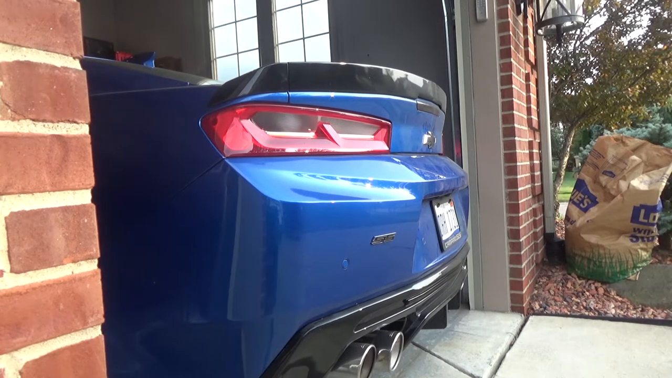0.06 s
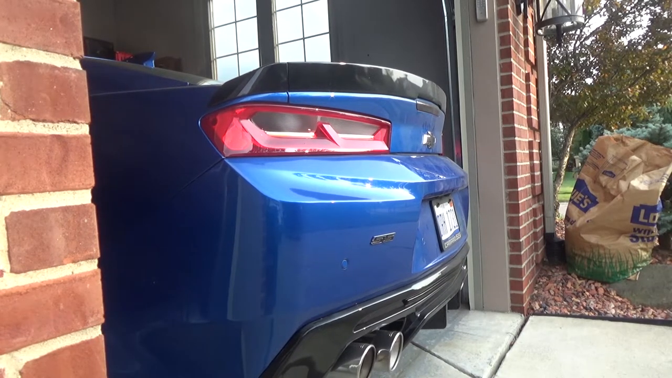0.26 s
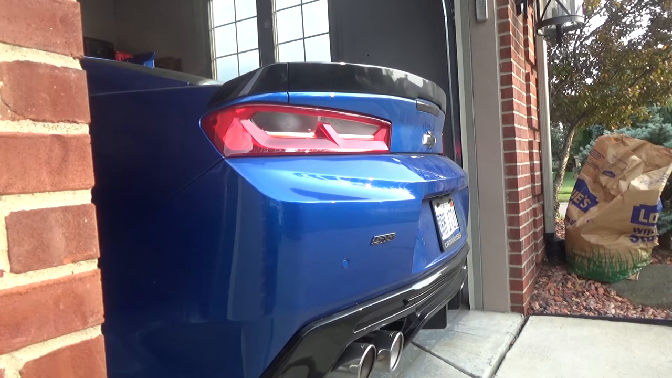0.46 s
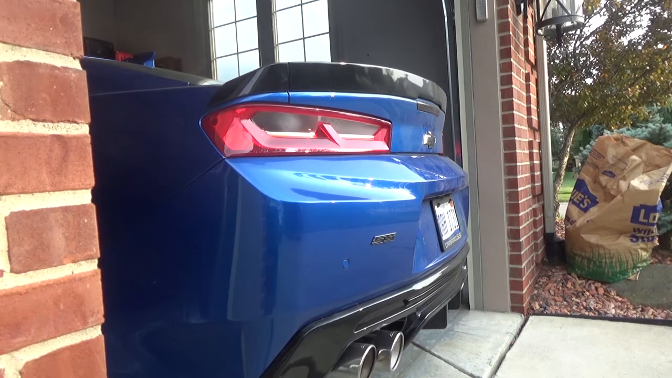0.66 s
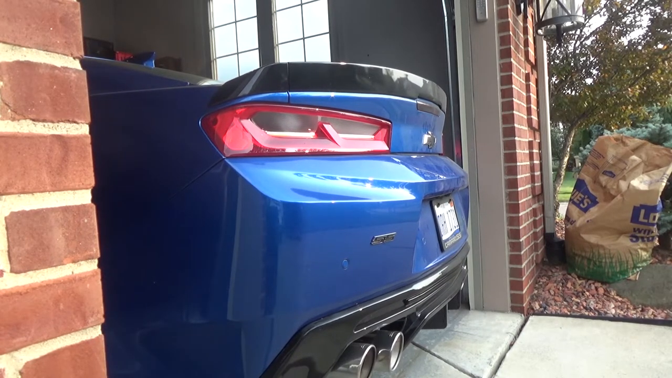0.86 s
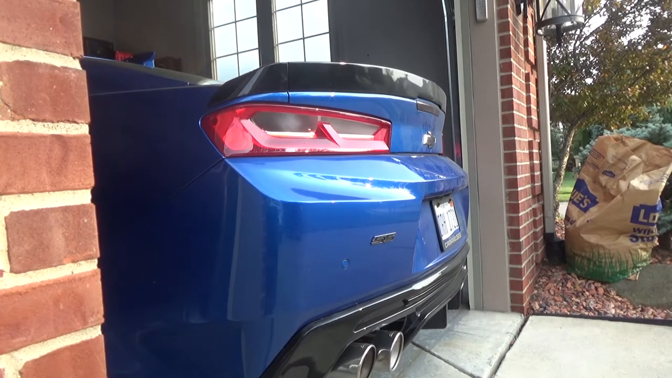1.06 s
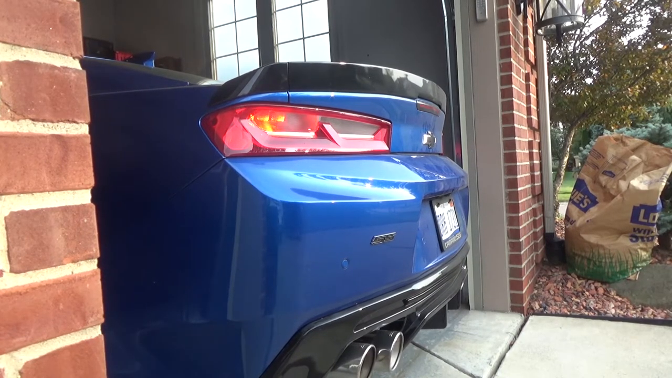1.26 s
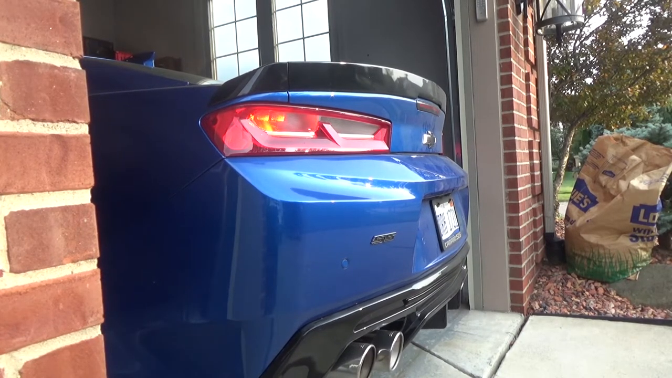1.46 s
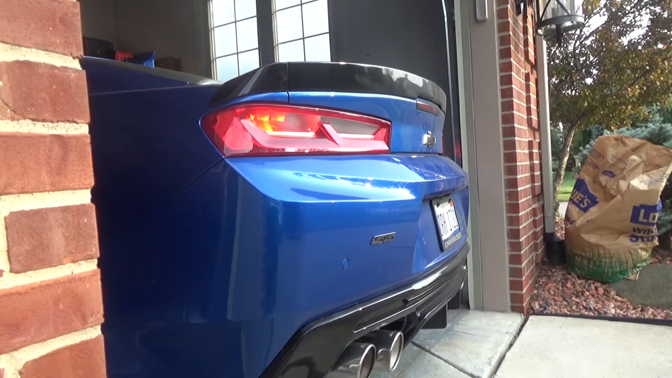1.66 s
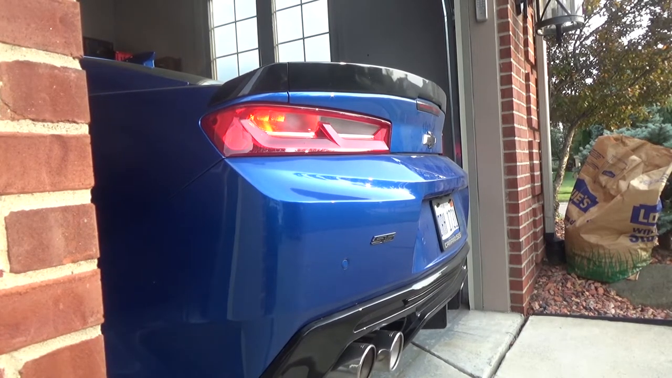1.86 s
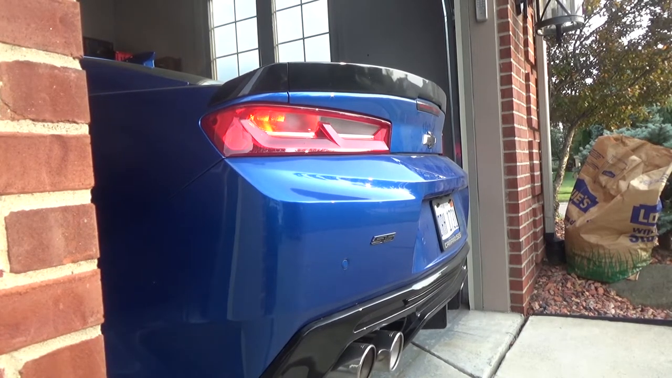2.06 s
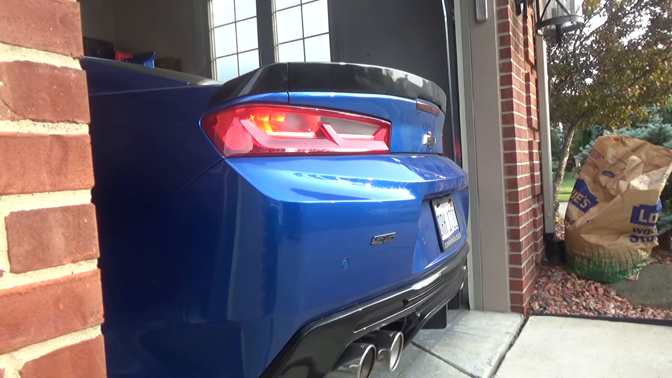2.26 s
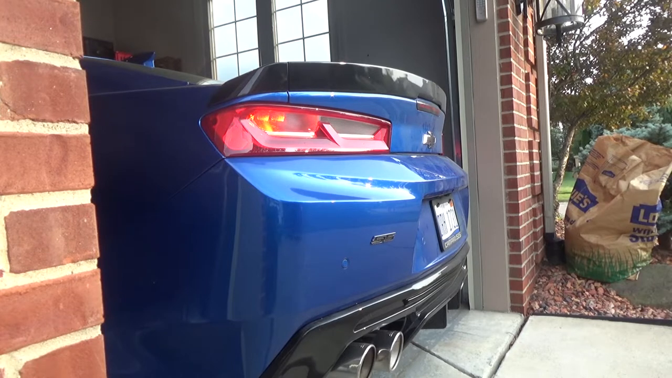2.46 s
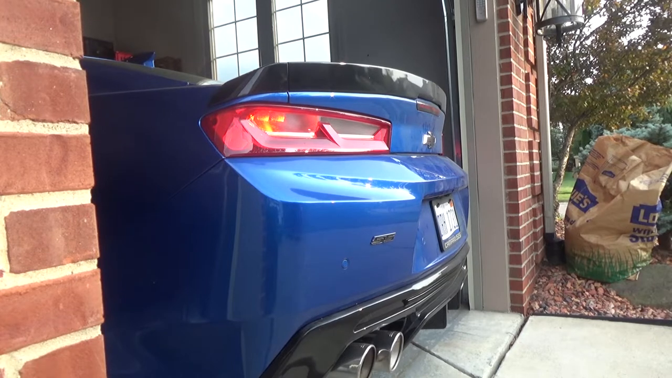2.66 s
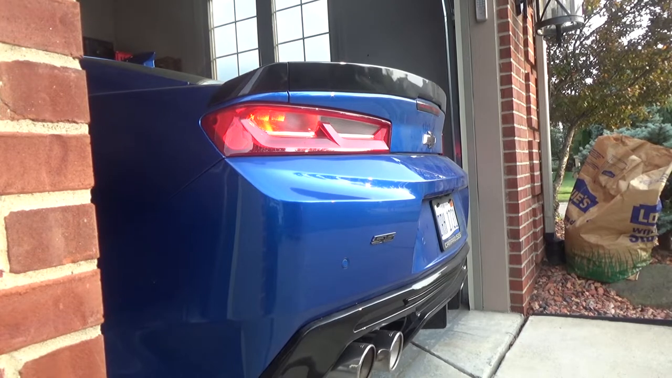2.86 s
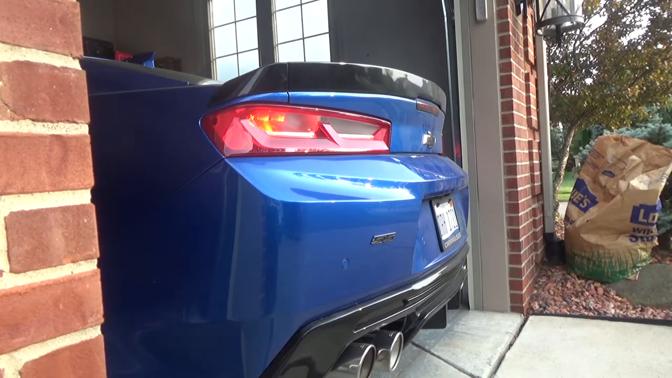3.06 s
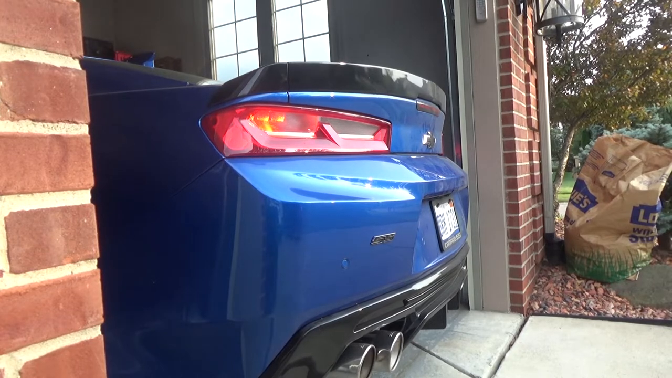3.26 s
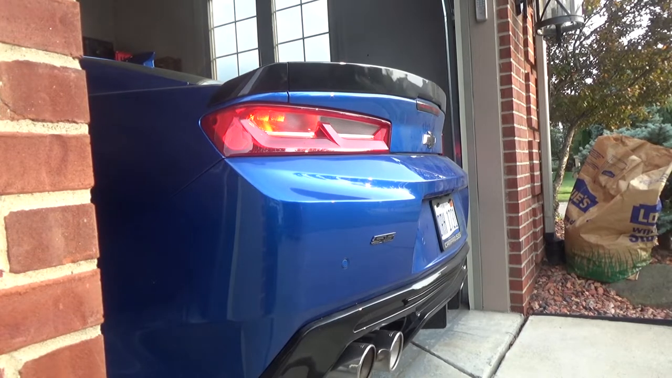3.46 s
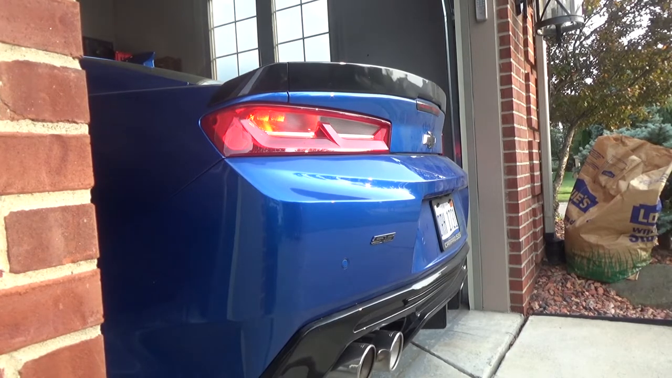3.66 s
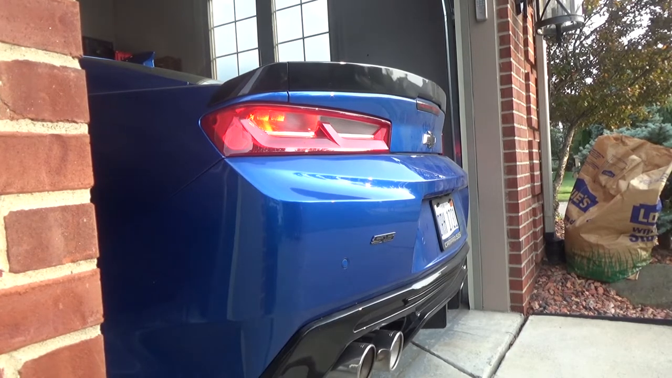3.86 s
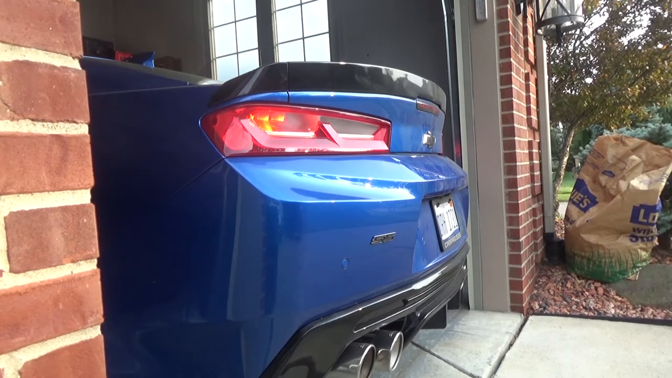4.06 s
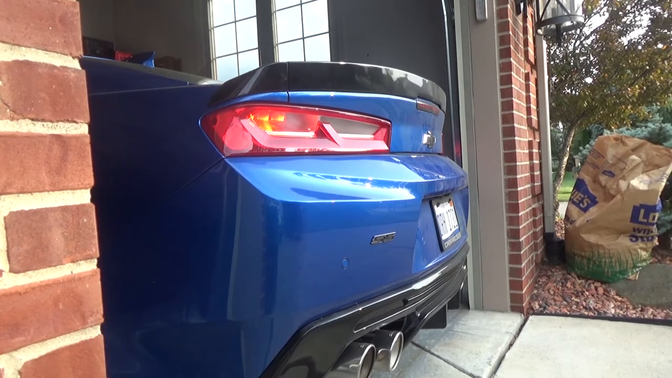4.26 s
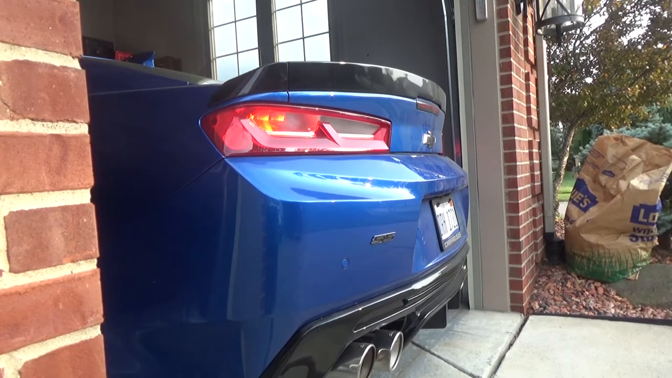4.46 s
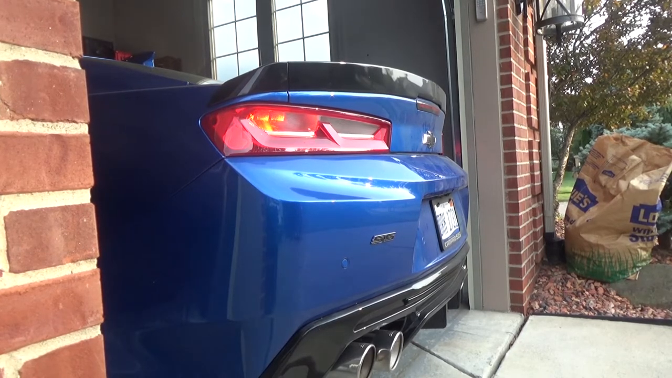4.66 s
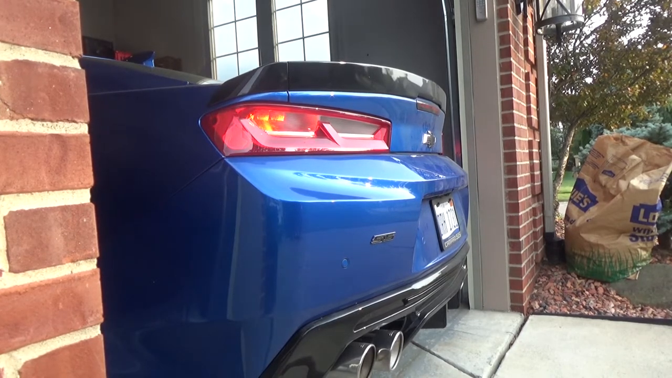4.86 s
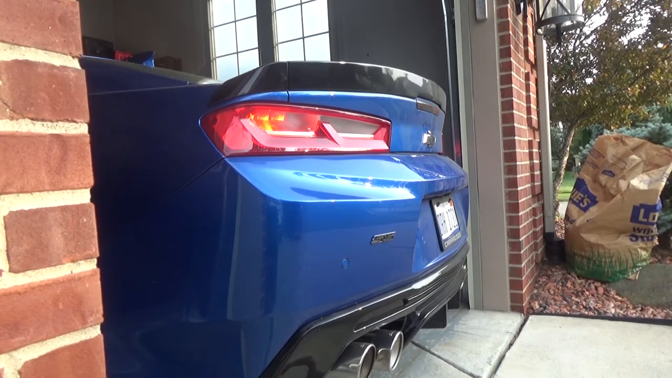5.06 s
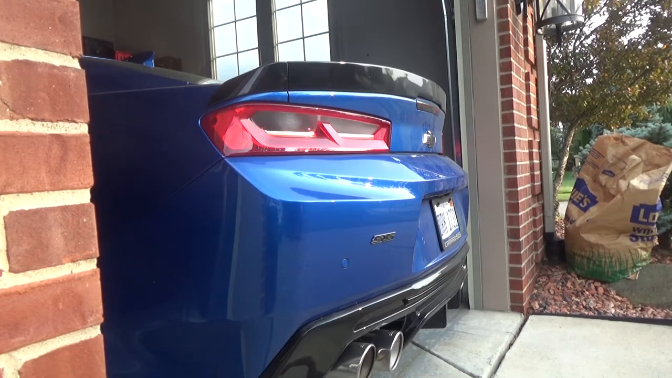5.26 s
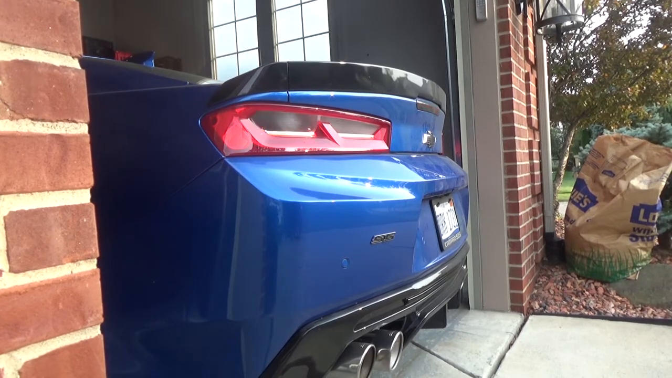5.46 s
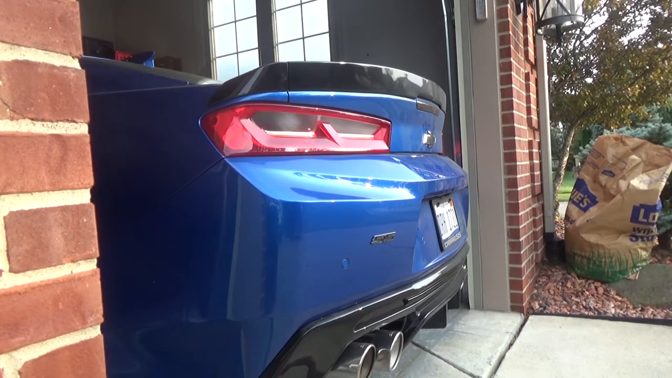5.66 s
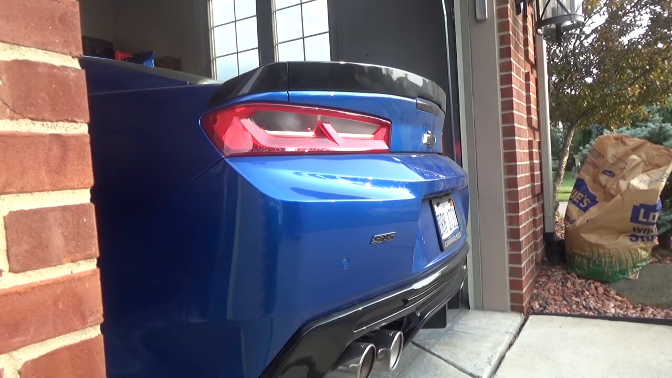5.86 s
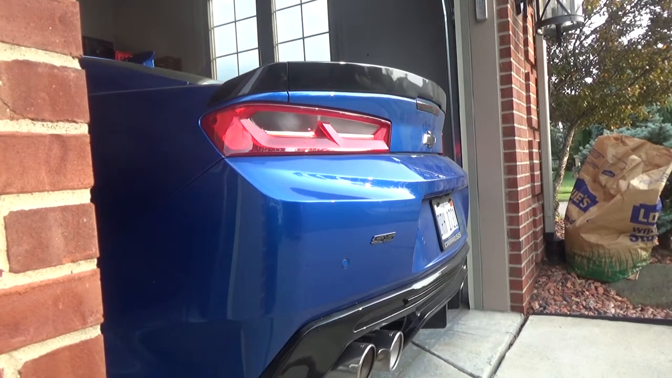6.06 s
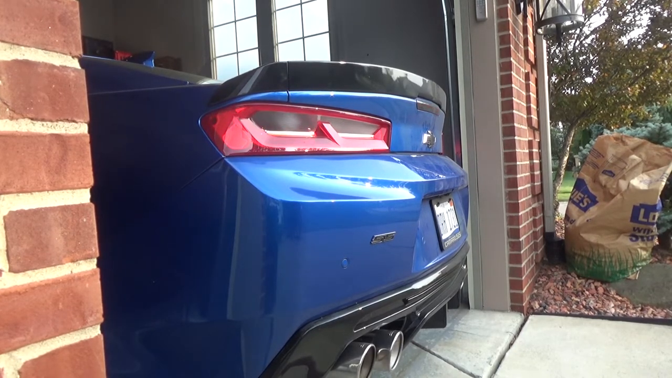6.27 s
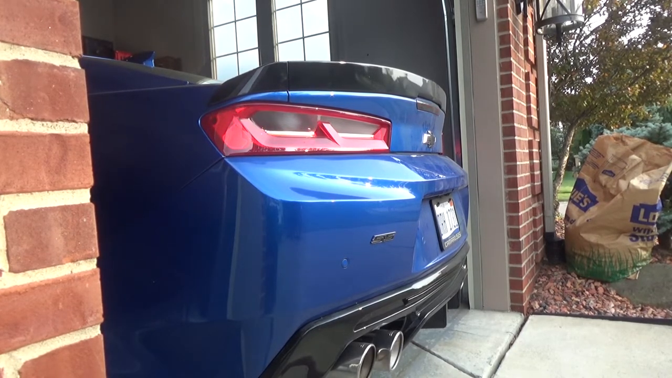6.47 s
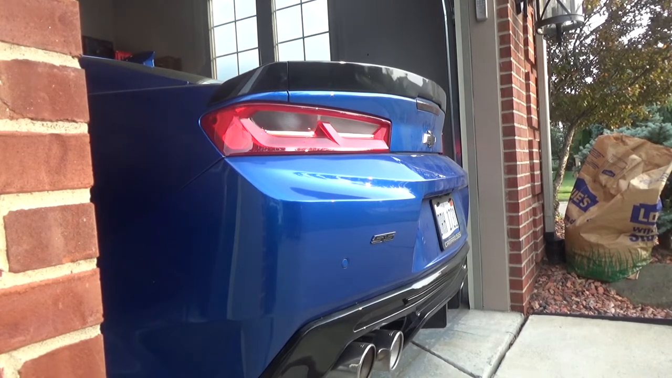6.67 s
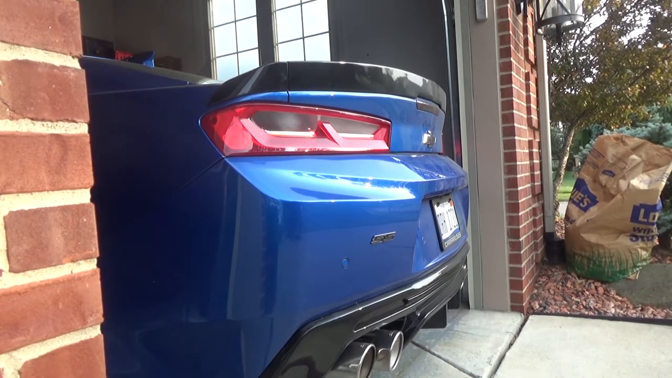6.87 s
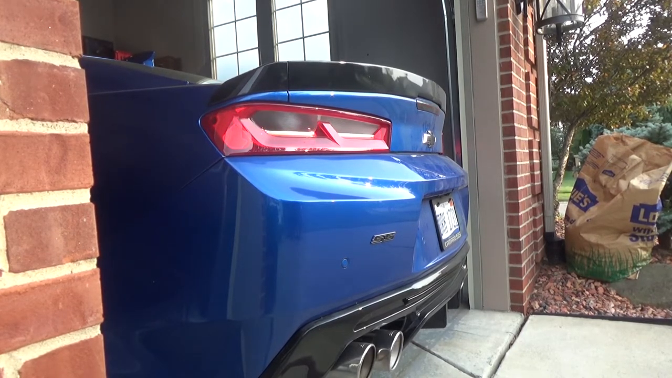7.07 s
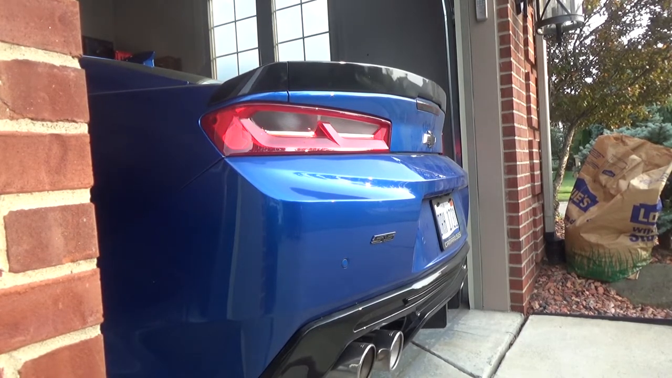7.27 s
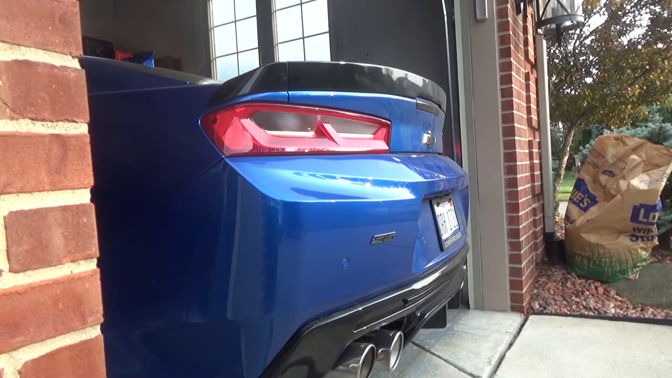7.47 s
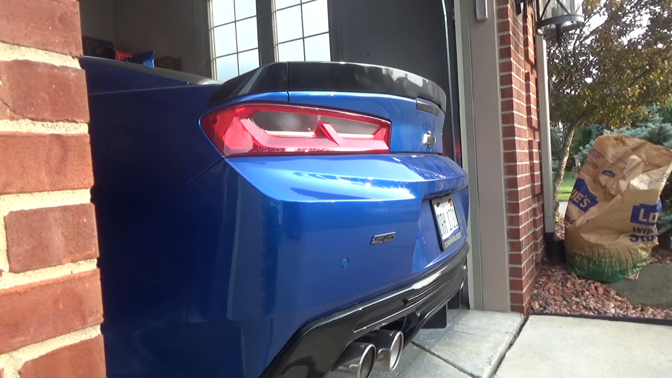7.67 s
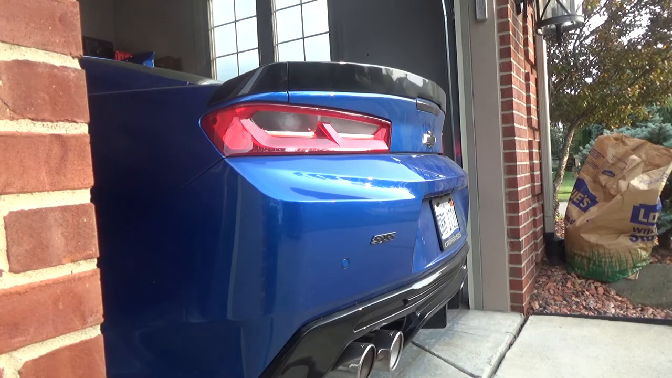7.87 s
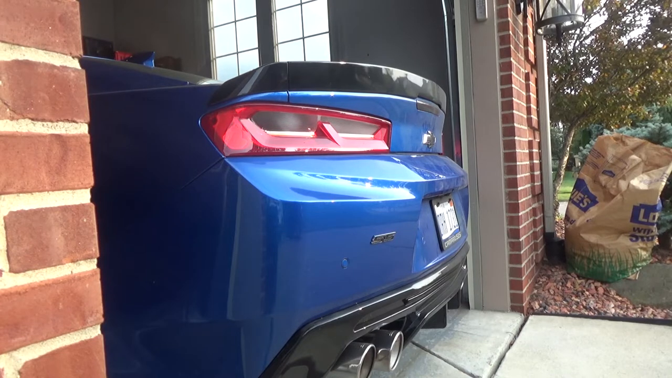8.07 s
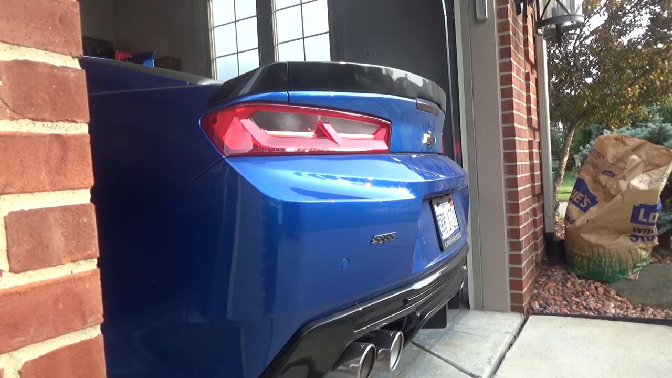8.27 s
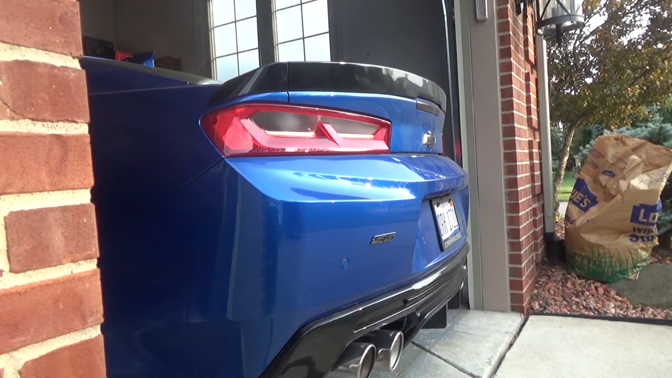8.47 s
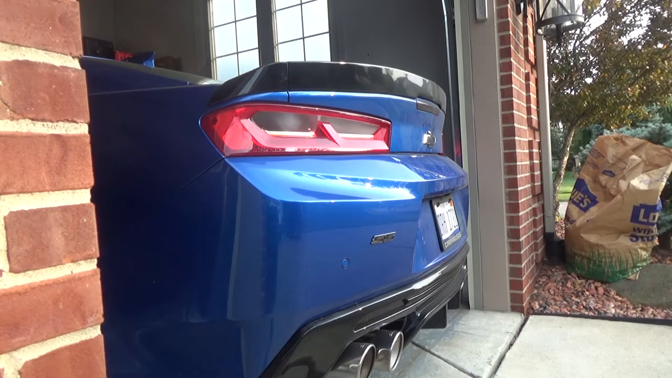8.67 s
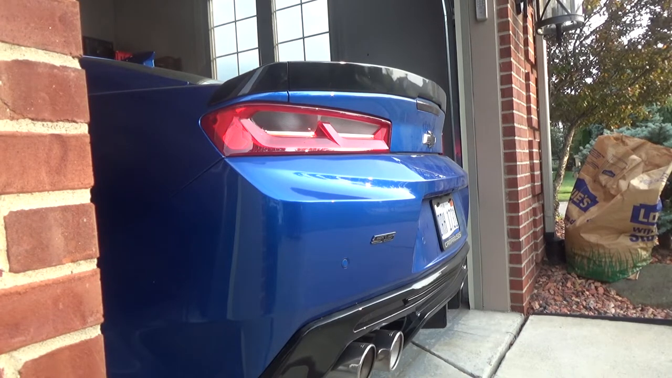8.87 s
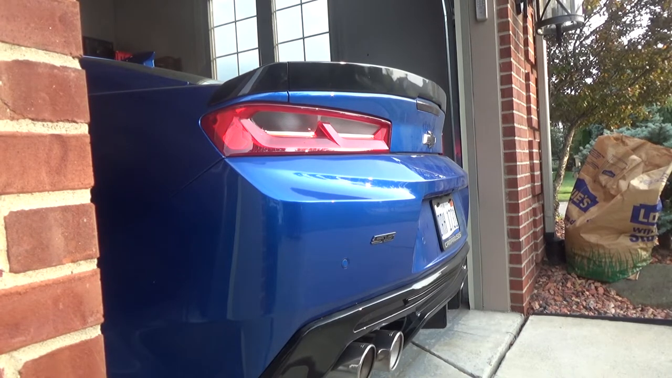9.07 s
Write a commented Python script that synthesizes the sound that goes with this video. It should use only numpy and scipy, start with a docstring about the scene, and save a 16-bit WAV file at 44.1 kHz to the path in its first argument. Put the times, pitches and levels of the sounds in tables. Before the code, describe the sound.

Insects trill over faint rumble, a car door thumps shut, a starter grinds, and a big eight-cylinder engine flares, then sinks to a loud lumpy idle.

```python
"""An eight-cylinder engine catches, flares and sinks to a loud lumpy idle in a garage mouth: impulses excite
pipe resonances, with tones at the firing rate and turbulent noise. Before it come the brushing noise and
blows of a shutting door, then the starter: gear noise through housing resonances over exhaust chuffs.
Insects sing outside as modulated whistles over distant rumble. Two ports take the sound in stereo."""
import sys
import numpy as np
from scipy import signal
from scipy.fft import rfft, irfft, next_fast_len
from scipy.io import wavfile
from scipy.ndimage import uniform_filter1d

SR = 44100
rng = np.random.default_rng(int(sys.argv[2]) if len(sys.argv) > 2 else 0)


def int16_out(signal):
    """Quantize to a 16-bit WAV file."""
    q = np.round(np.clip(np.atleast_2d(signal).T, -1, 1) * 32767)
    wavfile.write(sys.argv[1], SR, q.astype(np.int16))


N = 401751
T = np.arange(N) / SR  # time [s]

# Levels within a spectrum or a set of resonances are relative: the filtered sound is levelled afterwards.
# distant rumble spectrum: (frequency [Hz], density [dB per Hz])
RUMBLE_SPECTRUM = [(15, -55), (25, -26), (65, -1.5), (152, -4), (183, -7.5), (311, -13.5), (420, -17),
                   (555, -20.5), (923, -23), (6300, -41.5), (8190, -74), (13900, -120)]
RUMBLE_DB, AIR_DB = -40.5, -64
# distant insect chorus: (centre [Hz], width [Hz], level [dB])
FAR_CHORUS = (7830, 820, -49.5)
# two trains of a trilling insect: (time [s], level [dB] before panning, pitch [Hz], pulse rate [per s])
TRILL_TRAINS = [
    [(0.0, -44.5, 7270, 61), (1.93, -44.5, 7300, 48.5), (2.6, -42, 7400, 68)],
    [(3.9, -55, 7390, 43), (4.17, -56, 7340, 59), (4.61, -53, 7360, 48.6), (5.88, -50.5, 7430, 50.7),
     (7.83, -50.5, 7380, 42), (9.11, -51, 7380, 49)],
]
# cricket chirps: (time [s], level [dB] before echoes and panning)
CRICKET_CHIRPS = [(0.308, -44), (0.8, -43.5), (1.248, -44.5), (6.52, -54), (7.24, -59), (7.74, -57),
                  (8.255, -53), (8.725, -52)]
# parts of one chirp, a lead-in, three syllables and a faint echo: (time from the chirp [s], relative level
# [dB], pitch [Hz])
CHIRP_SYLLABLES = [(-.023, -13, 4640), (0, -4, 4780), (.041, -1, 4850), (.08, 0, 4850), (.14, -15, 4830)]
SCOOP_HZ, SCOOP_S = 320, .004  # each syllable starts this far below its note and slides up

# brief brushing before the door shuts: (time [s], level [dB])
BRUSHING = [(1.18, -74), (1.214, -58), (1.27, -53), (1.37, -60)]
# door and latch blows, thin at first touch, deep as the door seats:
# (time [s], level [dB], tick relative to thud [dB], thud decay t60 [s], lowest frequency [Hz])
DOOR_BLOWS = [(1.361, -27, -34, 0.22, 497), (1.378, -10.5, -30, 0.16, 400), (1.396, -13, -19, 0.17, 300),
              (1.415, -12, -30, 0.28, 60), (1.429, -11.5, -18, 0.34, 30), (1.462, -24, -30, 0.28, 30),
              (1.488, -20.5, -11.5, 0.64, 40), (1.821, -41, -7, 1, 603)]
# door panel spectrum: (frequency [Hz], density [dB per Hz])
PANEL_SPECTRUM = [(21, -43), (35, -10), (92, -1), (139, -12), (184, -2.5), (366, -10.5), (398, -7.5),
                  (425, -7.5), (728, -20), (1170, -19.5), (1880, -30.5), (2590, -33), (6000, -45),
                  (7800, -71), (13200, -120)]

# starter engaging, then labouring at each compression: (time [s], gear growl [dB], exhaust chuff [dB])
STARTER_STROKES = [(1.966, -21, -52), (2.13, -35, -42), (2.29, -30.5, -30.5), (2.446, -28, -40),
                   (2.58, -24.5, -49), (2.69, -27, -37)]
# gear tooth noise spectrum: (frequency [Hz], density [dB per Hz])
GEAR_SPECTRUM = [(88, -47), (150, -10.5), (230, -2), (290, -4.5), (766, -7.5), (1130, -6), (2450, -4.5),
                 (7560, -8), (10300, -12), (15500, -34)]
# starter and bell housing resonances: (frequency [Hz], width [Hz], relative level [dB])
HOUSING_MODES = [(250, 45, -9), (477, 39, 9), (1087, 13, 8), (1510, 4.8, 1)]
# gear whines, sounding only while the starter is on:
# (start [s], end [s], frequency [Hz], width [Hz], level [dB])
GEAR_WHINES = [(1.97, 2.2, 2230, 40, -39), (1.965, 2.08, 2850, 90, -35), (2.22, 2.38, 3650, 70, -42),
               (2.45, 2.53, 2920, 60, -39), (2.576, 2.788, 2790, 40, -37), (2.28, 2.5, 4750, 90, -45),
               (2.69, 2.79, 4750, 120, -43)]
STARTER_OFF_S, RUNNING_DB, GEAR_HISS_DB = 2.8, -28.5, -7  # the gear hiss is relative to the growl
LABOUR_RISE_S, LABOUR_FALL_S = .026, .045
CHUFF_LEAD_S, CHUFF_RISE_S, CHUFF_FALL_S = 0.037, 0.033, 0.11
RUNDOWN_DB, RUNDOWN_S, RUNDOWN_THROBS_PER_S = -4.5, 0.19, 10  # level relative to RUNNING_DB

# engine speed: (time [s], firing rate [Hz])
FIRING_RATE = [(2.77, 57.9), (2.8, 63.5), (2.91, 83.1), (3.03, 94.9), (3.07, 95.5), (3.21, 94.3),
               (3.28, 91.9), (3.6, 79.9), (3.71, 77.8), (4.08, 72.0), (4.73, 65.2), (5.56, 58.3),
               (5.81, 56.5), (6.3, 53.4), (7.04, 51.7), (9.11, 51.5)]
# how hard the engine is driven: (time [s], load relative to idle [dB])
ENGINE_LOAD = [(2.77, 12), (2.79, 9), (2.91, 9), (3.23, 5), (3.31, 1.5), (3.67, -2.5), (4.34, -2.5),
               (4.8, -1), (5.44, 1), (9.11, 0)]
# cylinders in firing order: (bank, beat [dB], header delay [ms], low rasp [dB], high rasp [dB])
FIRING_ORDER = [(0, 2.7, .91, 2, -1), (1, 1.2, 1.56, 0, 2), (1, -3.5, .26, -3, 5), (0, 3.5, -1.15, 5, -1),
                (1, 3.3, 2.05, 3, 4), (0, -1.3, -.29, 0, -1), (0, -3.5, -.35, 0, 1), (1, 3.5, 1.59, -3, 3)]
FIRST_CYLINDER = 4  # index of the first to fire
# exhaust pipe resonances, one list per bank: (frequency [Hz], width [Hz], relative level [dB])
PIPE_MODES = [
    [(51.5, 5.7, 13), (140.8, 6.3, 12.5), (168.4, 19, 2), (207.5, 5.3, 13), (230.2, 6.1, 16.5),
     (261.4, 13, 11), (313.1, 4.7, 8.5), (392, 10.8, 5)],
    [(61.3, 22.7, 6.5), (129, 5.3, -4), (198.2, 25.8, 12.5), (223.1, 32.8, 15), (241.3, 27, 14.5),
     (320, 28.5, 3.5), (369, 11.8, 10.5), (428, 64, -13)],
]
# tailpipe resonances, low list and high list: (frequency [Hz], width [Hz], relative level [dB])
TIP_MODES = [
    [(529, 50, -6.5), (629.4, 26, -0.5), (701.6, 33, 3.5), (874, 144, -6), (1890, 360, -21)],
    [(993, 103, -7.5), (1198.4, 58.5, -0.5), (1499, 59, -9.5), (1678, 32, -15.5), (2325, 15, -19),
     (2800, 370, -24.5)],
]
# exhaust hiss spectrum: (frequency [Hz], density [dB per Hz])
HISS_SPECTRUM = [(1060, -31), (1800, -5), (3770, -12), (6470, -13), (7610, -18.5), (7890, -11.5),
                 (9790, -11.5), (14600, -31.5), (15500, -38)]
# how strongly the pipes pass a clean multiple of the firing rate: (frequency [Hz], level [dB])
DRONE_RESPONSE = [(51, -16.5), (54, -18.5), (58, -22), (65, -18.5), (75, -20.5), (84, -24), (95, -25.5),
                  (104, -41), (130, -35.5), (145, -31), (160, -39), (190, -35), (207, -19.5), (236, -25),
                  (255, -25), (290, -48), (330, -30), (375, -20)]
# clean overtones: (multiple of the firing rate, level relative to the pipe response [dB])
OVERTONES = [(2, 3.5), (3, 2.5), (4, -4)]
# levels before the changes with load, speed and wander
BASE_LOW_DB, BASE_UPPER_DB, BASE_RASP_DB, BASE_HISS_DB = -17, -24, -28, -55
BASE_ROAR_DB = -53
# gain per dB of load [dB per dB]
HISS_FOLLOWS_LOAD, UPPER_FOLLOWS_LOAD, BRIGHT_FOLLOWS_LOAD, ROAR_FOLLOWS_LOAD = 0.47, 0.25, 0.34, 2.3
# the beats brighten above this firing rate
RACING_HZ, RACING_SPAN_HZ, RACING_LOW_DB, RACING_UPPER_DB = 86.2, 5.2, -2, 8
CATCH_DB, CATCH_S = 8, .06  # the first firings boom harder
UNEVEN_DB, UNEVEN_S = .7, .06  # combustion wanders a little

# garage reverberation: (frequency [Hz], decay t60 [s])
GARAGE_DECAY = [(60, 0.87), (300, 0.28), (1500, 0.36), (8000, 0.11)]
# phase between the microphone ports: (frequency [Hz], left lead [rad])
PORT_PHASE = [(0, 0), (260, 0.5), (1640, -0.3), (1980, 0.1), (2410, 0.2), (2670, -0.0), (6550, 0.0),
              (6800, 0.6), (7060, 0.1), (7320, -0.0), (8100, 0.1), (8790, -0.0), (15200, 0.0)]
# level between the microphone ports: (frequency [Hz], left minus right [dB])
PORT_BALANCE = [(60, 1.0), (150, 2.5), (380, 2.5), (950, 2.0), (2380, -1.0), (5980, 2.5), (15000, 0.0)]
EDGE_HZ = 15700  # upper band limit


def amp(db):
    """Decibel law: 20 dB is a factor of ten in amplitude."""
    return 10 ** (np.asarray(db) / 20)


def evened(x):
    """Normalization to unit root mean square."""
    return x / np.sqrt(np.mean(x ** 2) + 1e-20)


def read(points, hz):
    """Interpolation of a spectrum on a logarithmic frequency axis."""
    f, value = np.transpose(points)
    return np.interp(np.log(hz + 1), np.log(f + 1), value)


def curves(rows):
    """Linear interpolation in time: each column, then a gate open while the table lasts."""
    s, *columns = np.transpose(rows)
    opening = np.clip((T - s[0]) / 0.008025, 0, 1)
    lasts_to_end = s[-1] > T[-1] - .05
    closing = np.clip((s[-1] - T) / 0.019 + lasts_to_end, 0, 1)
    return [np.interp(T, s, c) for c in columns] + [opening * closing]


def coloured(x, points):
    """Spectral shaping: multiplication by a frequency response, then levelling."""
    size = next_fast_len(x.shape[-1], True)
    response = amp(read(points, np.fft.rfftfreq(size, 1 / SR)))
    return evened(irfft(rfft(x, size) * response, size)[..., :x.shape[-1]])


def ring(x, modes):
    """Modal superposition: two-pole resonances of alternate sign, each with its peak at its dB."""
    out = 0
    for k, (hz, width, db) in enumerate(modes):
        out = out + (-1) ** k * amp(db) * signal.lfilter(*signal.iirpeak(hz, hz / width, SR), x)
    return out


def band(x, lo_hz, hi_hz):
    """Band-pass filtering."""
    return signal.sosfilt(signal.butter(N=2, Wn=[lo_hz, hi_hz], btype="band", fs=SR, output="sos"), x)


def soft(x, hz):
    """Low-pass filtering, which blunts sharp fronts."""
    return signal.sosfilt(signal.butter(N=2, Wn=hz, fs=SR, output="sos"), x)


def fading(x, ms):
    """First-order relaxation: each impulse becomes a sudden rise with an exponential fall."""
    return signal.lfilter([1], [1, -np.exp(-1000 / (ms * SR))], x)


def swells(starts, levels_db, rise_s, fall_s):
    """Superposed envelopes: a straight rise and an exponential fall at each start."""
    since = T - np.reshape(starts, (-1, 1))
    rise = np.clip(since / rise_s, 0, 1)
    fall = np.exp(-np.maximum(since - rise_s, 0) / fall_s)
    return amp(levels_db) @ (rise * fall)


def yard():
    """Partial coherence: rumble alike in both ports only in the bass, with a swelling far insect chorus."""
    a, b, c, d, e = rng.standard_normal((5, N))
    other = signal.sosfilt(signal.butter(N=2, Wn=700, btype="high", fs=SR, output="sos"), [b, c])
    rumble = amp(RUMBLE_DB) * coloured(a + 0.63 * other, RUMBLE_SPECTRUM)
    hz, width, db = FAR_CHORUS
    swell = amp(0.99 * np.sin(2 * np.pi * (2.0 * T + 0.74)))
    swell *= np.clip((2.7 - T) / 0.19, .3, 1)  # the far chorus is turned down to 0.3 from about 2.5 s
    voices = np.array([d + 0.21 * e, d - 0.58 * e])
    chorus = ring(ring(voices, [(hz, width, 0)]), [(hz, 2.0 * width, 0)])
    chorus = amp(db) * swell * evened(chorus)
    air = amp(AIR_DB) * evened(band(a + 0.056 * other, 6900, 14300))
    # one of the far insects calls higher, in slow regular swells
    calls = np.maximum(np.sin(2 * np.pi * (2.62 * T - .42)), 0) ** 2 * (T < 2)
    caller = amp(-57) * calls * evened(ring(ring(e, [(8550, 350, 0)]), [(8550, 350, 0)]))
    return rumble + chorus + caller + air


def trill(rows):
    """Amplitude modulation: wing strokes pulse a whistle roughened by narrow-band noise."""
    db, hz, rate, gate = curves(rows)
    noise = rng.standard_normal((2, N))
    strokes = np.cumsum(rate) / SR % 1
    wobble = soft(noise[0] + 1j * noise[1], 160)
    rough = evened(abs(wobble)) * wobble / abs(wobble + 1e-20)
    carrier = np.exp(2j * np.pi * np.cumsum(hz) / SR)
    whistle = ((0.49 + rough) * carrier).real
    pulses = .65 + np.exp(-((strokes - .5) / .2) ** 2)
    return gate * amp(db) * evened(whistle * pulses)


def cricket():
    """Stridulation: syllables with a weak octave, run together by echoes from the yard walls."""
    out, t = np.zeros(N), T[:1250]
    for s, db in CRICKET_CHIRPS:
        for after, part_db, hz in CHIRP_SYLLABLES:
            turn = 2 * np.pi * (hz * t + SCOOP_HZ * SCOOP_S * np.exp(-t / SCOOP_S))
            flutter = 1 + .35 * evened(uniform_filter1d(rng.standard_normal(len(t)), size=60))
            shape = np.hanning(len(t)) ** 0.4 * flutter
            tone = np.sin(turn) + 0.13 * np.sin(2 * turn)
            out[round((s + after) * SR):][:len(t)] += amp(db + part_db) * shape * tone
    echoes = rng.standard_normal(SR // 4) * amp(-60 * T[:SR // 4] / 0.14)
    return out + signal.fftconvolve(out, echoes / np.linalg.norm(echoes))[:N]


def rustle():
    """Friction noise: something brushes past just before the door shuts."""
    db, gate = curves(BRUSHING)
    return gate * amp(db) * evened(band(rng.standard_normal(N), 2300, 5600))


def door():
    """Impact excitation: each blow is a dull panel burst, a short latch tick and ringing thin metal."""
    out, t = np.zeros(N), T[:SR // 2]
    for s, db, tick_db, t60, low_hz in DOOR_BLOWS:
        noise = rng.standard_normal((2, len(t)))
        knee_hz = min(1500 + 8 * low_hz, 9000)  # thinner blows reach higher
        thud = evened(band(coloured(noise[0], PANEL_SPECTRUM), low_hz, knee_hz))
        thud *= amp(-60 * t / max(t60, .02)) * np.minimum(t / 0.003, 1)
        tick = evened(band(noise[1], 1700, 10500)) * amp(tick_db - 60 * t / 0.21)
        skin = evened(ring(noise[1], [(2570, 170, 0), (3220, 450, -2)]))
        skin *= amp(-22.5 - 60 * t / .5) * np.minimum(t / 0.0028, 1)
        out[round(s * SR):][:len(t)] += amp(db) * (thud + tick + skin)
    return out


def starter():
    """Forced vibration: gear teeth rattle the housing; air pumped through the cold exhaust chuffs beneath."""
    s, growl_db, chuff_db = np.transpose(STARTER_STROKES)
    gate = np.clip((T - s[0]) / 0.0035, 0, 1) * np.clip((STARTER_OFF_S - T) / 0.0068, 0, 1)
    labour = amp(RUNNING_DB) * np.clip((T - s[0]) / LABOUR_RISE_S, 0, 1)
    labour += swells(s, growl_db, LABOUR_RISE_S, LABOUR_FALL_S)
    draw, noise = rng.random(N), rng.standard_normal((3, N))
    # random tooth impacts, 700 per second on average, over a steady rub
    teeth = fading(amp(2.5 * noise[0]) * (draw < 700 / SR), ms=2.2) + 1.2
    whines = np.zeros(N)
    for s0, s1, hz, width, db in GEAR_WHINES:
        part = slice(round(s0 * SR), round(s1 * SR))
        tone = evened(ring(noise[2, part], [(hz, width, 0)]))
        whines[part] += amp(db) * tone * signal.windows.tukey(len(tone), .4)
    grind = coloured(teeth * noise[1], GEAR_SPECTRUM)
    housing = evened(ring(teeth * noise[1], HOUSING_MODES))
    growl = evened(evened(band(grind, 235, 1260)) + 0.59 * housing)
    hiss = evened(band(grind, 2900, 16000))
    chuff = evened(ring(noise[2], [(49.3, 7.3, 7), (97, 30, -24)]))
    chuff *= swells(s - CHUFF_LEAD_S, chuff_db, CHUFF_RISE_S, CHUFF_FALL_S)
    # the released gear runs down as a fading, throbbing hiss
    since = np.maximum(T - STARTER_OFF_S, 0)
    throb = 0.36 + np.sin(np.pi * RUNDOWN_THROBS_PER_S * since) ** 4
    released = (1 - gate) * (T > s[-1])
    rundown = amp(RUNNING_DB + RUNDOWN_DB) * released * np.exp(-since / RUNDOWN_S) * throb
    return gate * (labour * (growl + amp(GEAR_HISS_DB) * hiss) + chuff + whines) + rundown * hiss


def engine():
    """Pulse-excited resonance: each cylinder beats down its bank's pipe, in a cycle of eight firings."""
    (hz, gate), (load_db, _) = curves(FIRING_RATE), curves(ENGINE_LOAD)
    racing = 1 / (1 + np.exp((RACING_HZ - hz) / RACING_SPAN_HZ))
    # wander is drawn every 256 samples, smoothed and interpolated
    wander = uniform_filter1d(rng.standard_normal((4, N // 256 + 2)), size=max(round(UNEVEN_S * SR / 256), 1))
    wander_db = [UNEVEN_DB * np.interp(T, np.arange(len(w)) * 256 / SR, evened(w)) for w in wander]
    low_db = BASE_LOW_DB + RACING_LOW_DB * racing + wander_db[0]
    upper_db = BASE_UPPER_DB + RACING_UPPER_DB * racing + UPPER_FOLLOWS_LOAD * load_db + wander_db[1]
    rasp_db = BASE_RASP_DB + load_db + wander_db[2]
    hiss_db = BASE_HISS_DB + HISS_FOLLOWS_LOAD * load_db + 1.8 * wander_db[2]
    catch_db = CATCH_DB * np.exp(-abs(T - FIRING_RATE[1][0]) / CATCH_S)
    boom_db = read(DRONE_RESPONSE, hz) + catch_db + wander_db[3]

    turns = .5 + np.cumsum(hz * gate) / SR  # the first cylinder is half way to firing
    fired = np.flatnonzero(np.diff(np.floor(turns)))
    order = (np.arange(len(fired)) + FIRST_CYLINDER) % len(FIRING_ORDER)
    bank, cyl_db, delay_ms, *crack_db = np.transpose(FIRING_ORDER)[:, order]
    chance = rng.standard_normal((len(fired), 4))
    delay = ((delay_ms + 0.22 * chance[:, 0]) * SR / 1000).astype(int)
    at = np.clip(fired + delay, 0, N - 1)
    beats, cracks = np.zeros((2, 2, N))
    beats[bank.astype(int), at] = amp(cyl_db + 1.1 * chance[:, 1])
    cracks[:, at] = amp(crack_db + 2.0 * chance[:, 2:].T)

    piped = ring(beats[0], PIPE_MODES[0]) + ring(beats[1], PIPE_MODES[1])
    body = soft(piped, 550) / np.sqrt(hz)  # a beat has a blunt front
    # the upper pipe modes answer more strongly to hard running
    upper = signal.sosfiltfilt(signal.butter(N=3, Wn=300, btype="high", fs=SR, output="sos"), body)
    body = amp(low_db) * evened(body - upper) + amp(upper_db) * evened(upper)

    # gas tears through the tips: a sharp front, then a dying puff of turbulence
    puffs = fading(cracks, ms=8.0)
    noise = rng.standard_normal((3, N))
    tearing = 10.0 * cracks + (puffs + .35) * noise[:2]
    bright = amp(BRIGHT_FOLLOWS_LOAD * load_db) * ring(tearing[1], TIP_MODES[1])
    rasp = evened(soft(ring(tearing[0], TIP_MODES[0]) + bright, 2100) * gate)
    # ragged upper roar of the flare
    roar = amp(BASE_ROAR_DB + ROAR_FOLLOWS_LOAD * load_db) * evened(band(tearing[1], 1350, 2300))
    hiss = coloured((puffs.sum(axis=0) + 6.2) * noise[2], HISS_SPECTRUM)
    hiss /= np.std(band(hiss, 8200, 12000))  # its level refers to this band

    # the even part of the firing sounds as clean multiples that glide with the speed
    boom = np.sqrt(2) * np.sin(2 * np.pi * (turns + 0.4))
    overtones = np.zeros(N)
    for k, db in OVERTONES:
        level = amp(db + read(DRONE_RESPONSE, k * hz))
        overtones += np.sqrt(2) * level * np.sin(2 * np.pi * k * turns + 0.25)
    return gate * (overtones + amp(boom_db) * boom + body + amp(rasp_db) * rasp + roar + amp(hiss_db) * hiss)


def garage(x):
    """Reverberation: sparse reflections of random sign, each band dying at its own speed."""
    taps = np.zeros((2, SR // 2))
    slots = np.arange(200, SR // 2 - 20, 20)
    at = slots + rng.integers(0, 20, (2, len(slots)))
    np.put_along_axis(taps, at, rng.choice([-1., 1.], at.shape), 1)
    hz, t, z = signal.stft(taps, SR, nperseg=512)
    decay = amp(-60 * t / read(GARAGE_DECAY, hz)[:, None])
    tail = signal.istft(z * decay, SR, nperseg=512)[1]
    return signal.fftconvolve(x[None], tail / np.linalg.norm(tail[0]), axes=1)[:, :N]


def ports(x):
    """Interaural principle: level and phase differences place one near source in two ports."""
    size = next_fast_len(N, True)
    hz = np.fft.rfftfreq(size, 1 / SR)
    half = amp(read(PORT_BALANCE, hz) / 2) * np.exp(.5j * read(PORT_PHASE, hz))
    return irfft(rfft(x, size) * np.array([half, 1 / half]), size)[:, :N]


def scene():
    """Superposition of near sources, their reflections, the insects and the yard."""
    thud = door()
    brushing = rustle()
    car = starter() + engine()
    near = car + thud + brushing
    walls = garage(amp(-17) * band(car, 293, 4200) + amp(-18.5) * thud)
    trills = trill(TRILL_TRAINS[0]) + trill(TRILL_TRAINS[1])
    # (left, right) gains [dB]
    insects = amp([[2.5], [-3]]) * trills + amp([[-.4], [.4]]) * cricket()
    return ports(near) + walls + insects + yard()


def record(dry):
    """Saturation: the input stage rounds off the tallest peaks; then the band limit."""
    rounded = 0.78 * np.tanh(dry / 0.93)
    lowpass = signal.firwin(511, EDGE_HZ, window=("kaiser", 9), fs=SR)
    return signal.oaconvolve(rounded, lowpass[None], "same")


dry = scene()
out = record(dry)
int16_out(out)
```